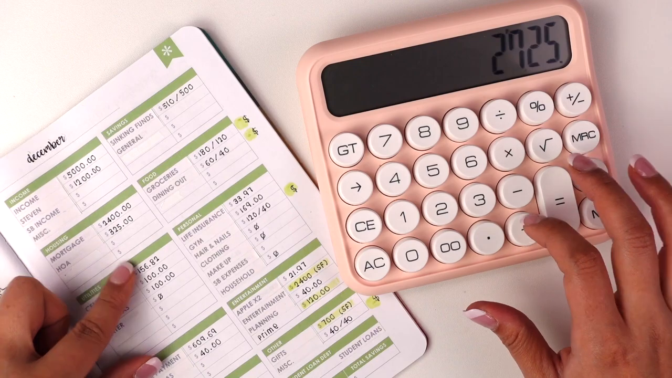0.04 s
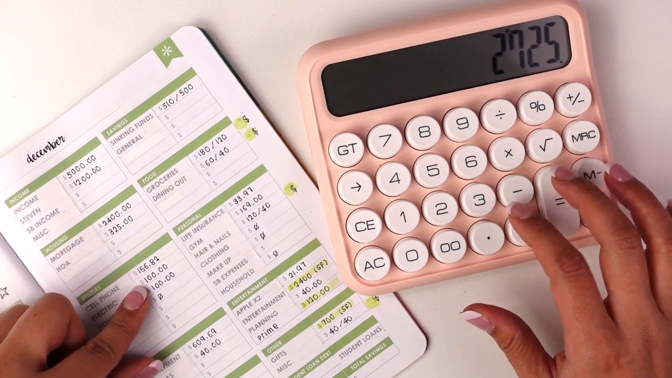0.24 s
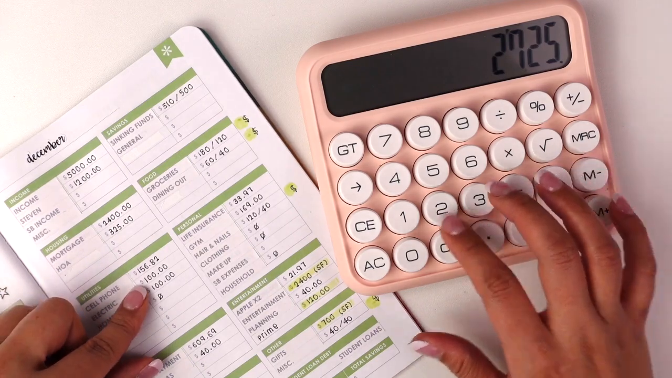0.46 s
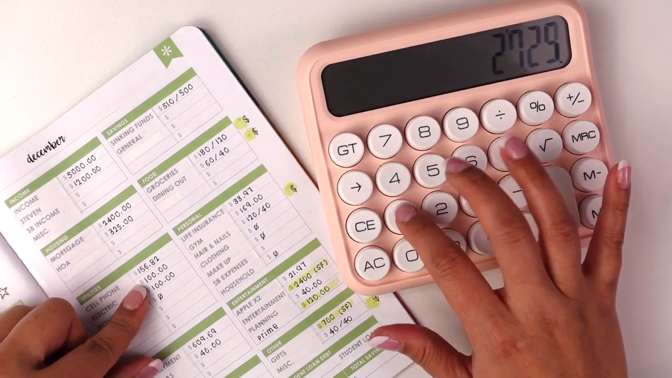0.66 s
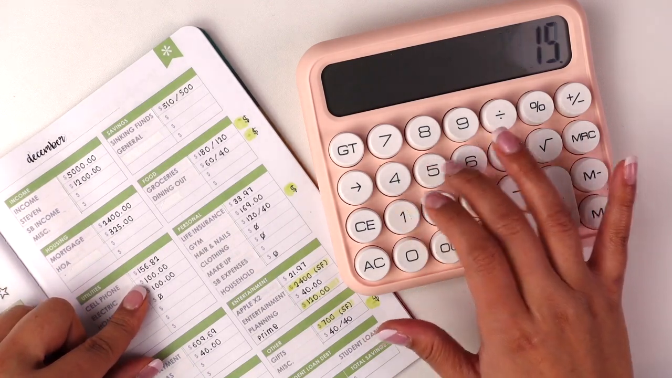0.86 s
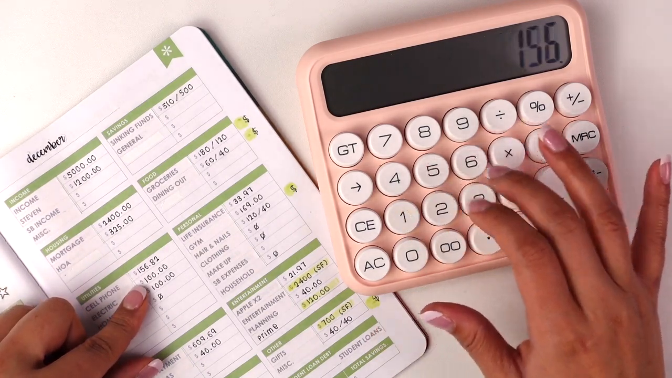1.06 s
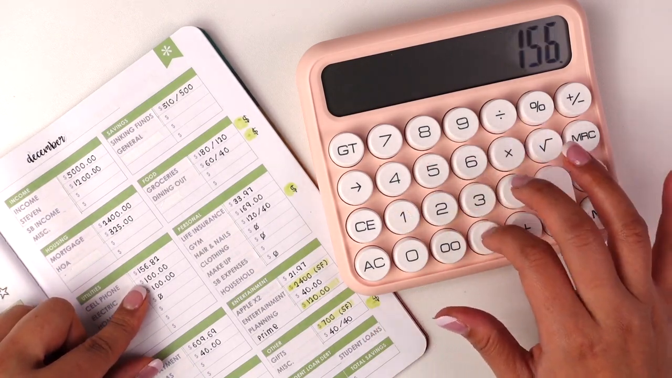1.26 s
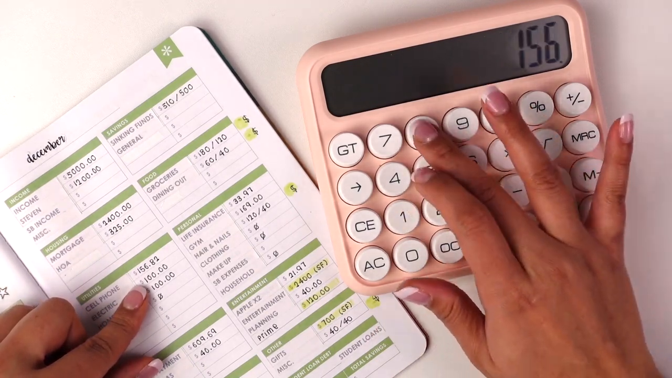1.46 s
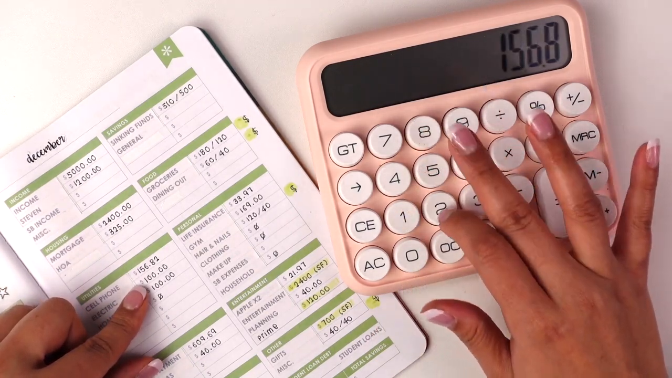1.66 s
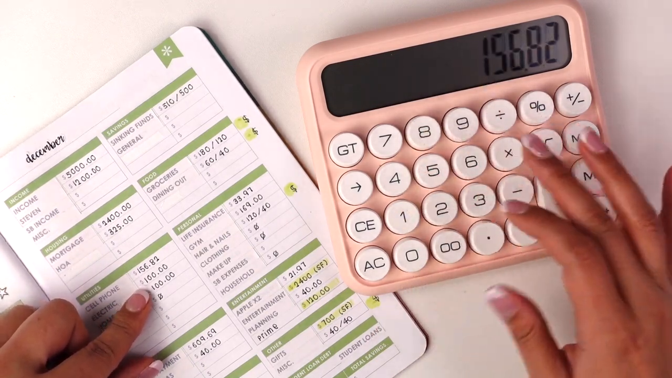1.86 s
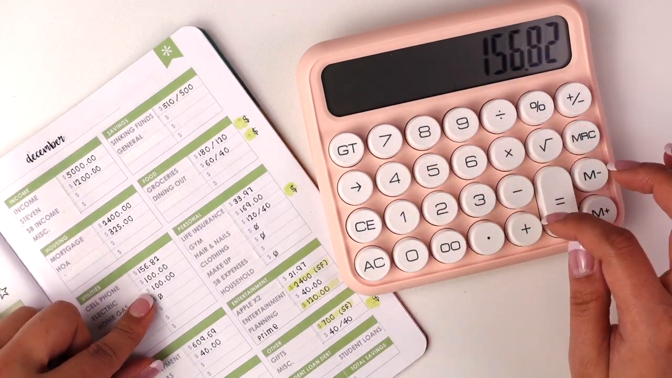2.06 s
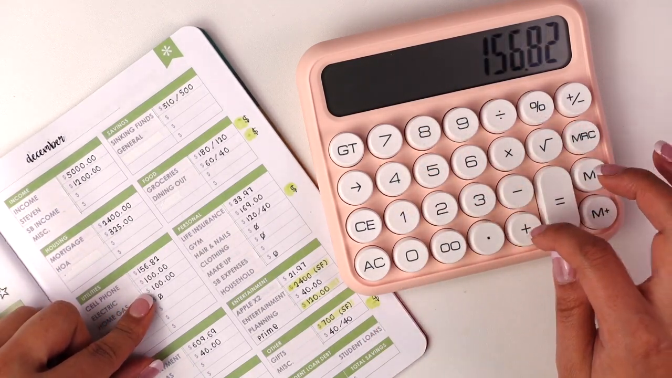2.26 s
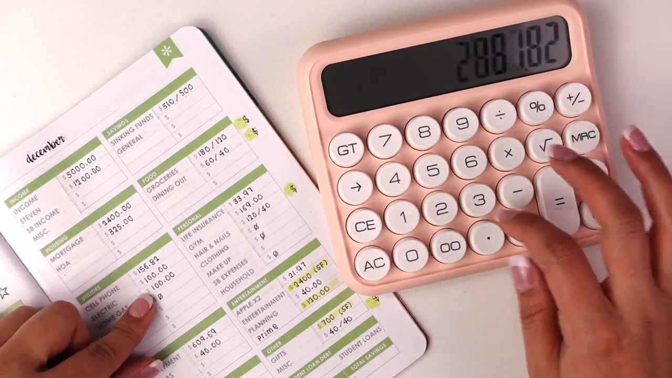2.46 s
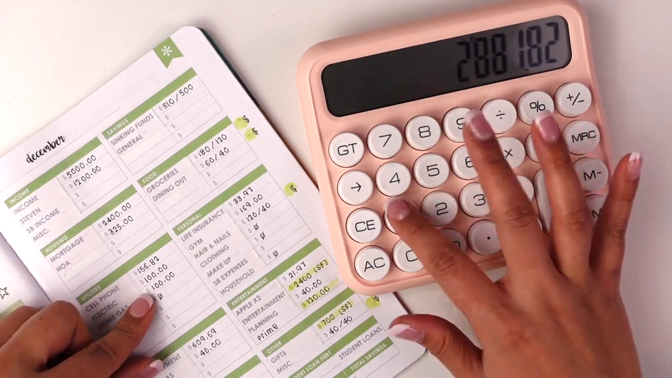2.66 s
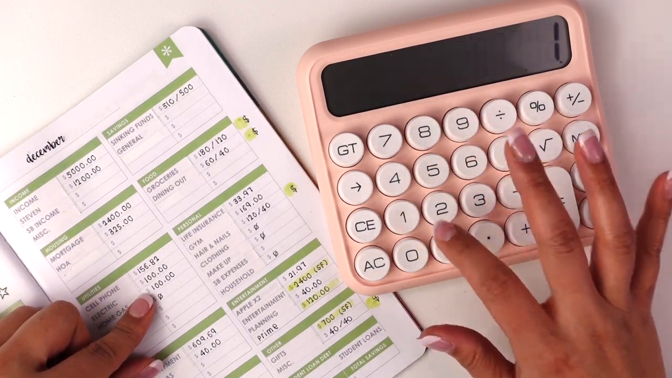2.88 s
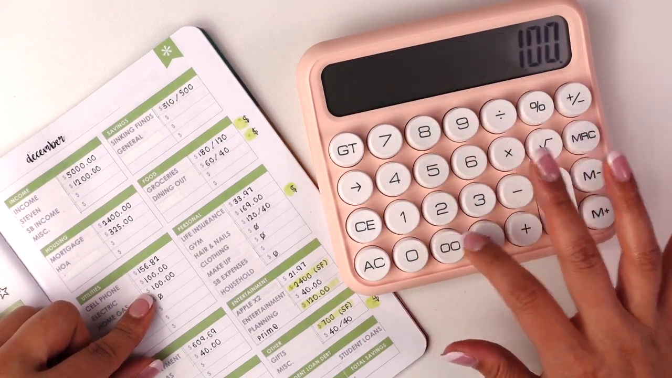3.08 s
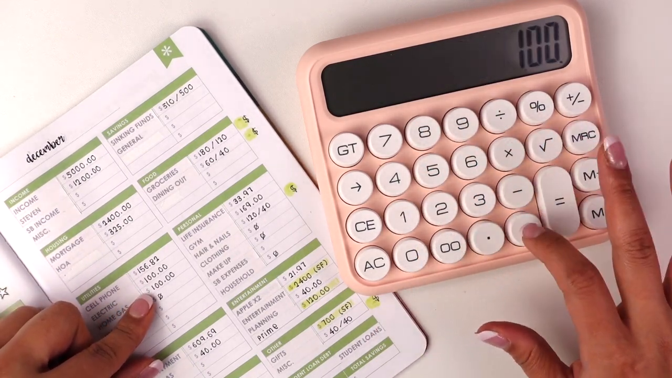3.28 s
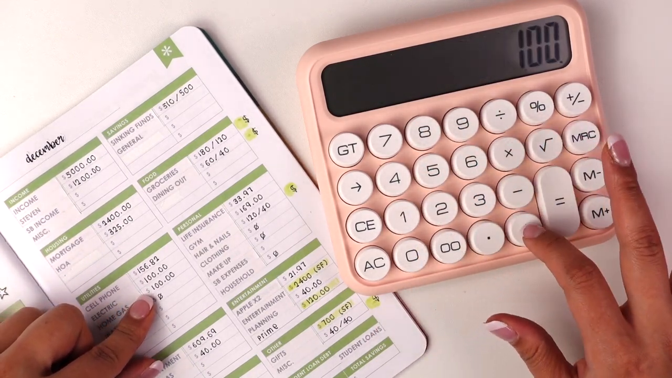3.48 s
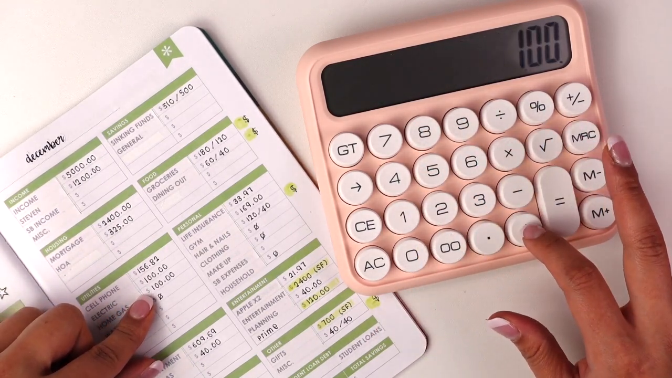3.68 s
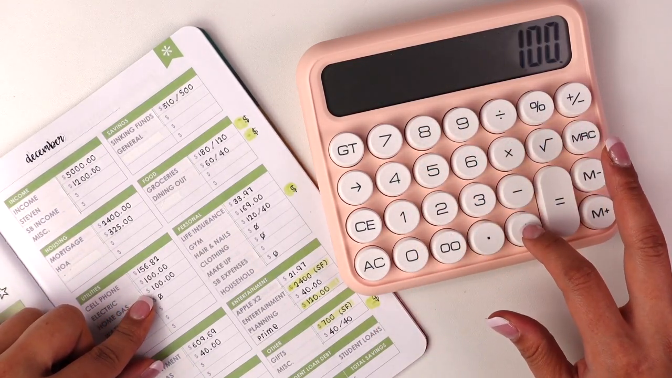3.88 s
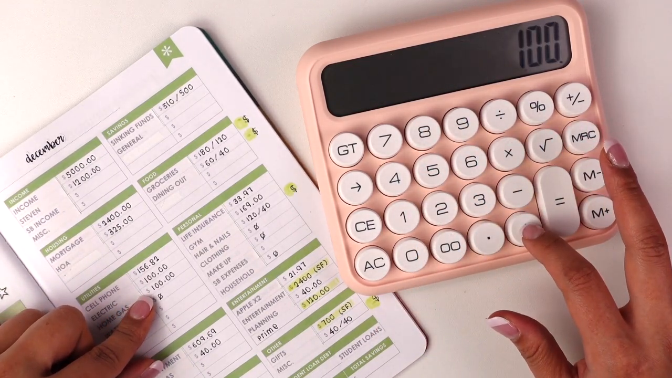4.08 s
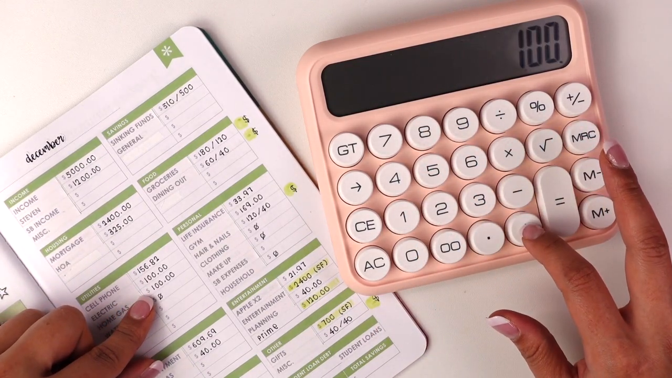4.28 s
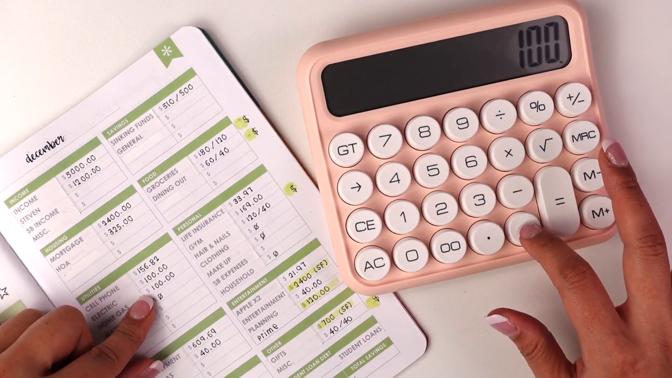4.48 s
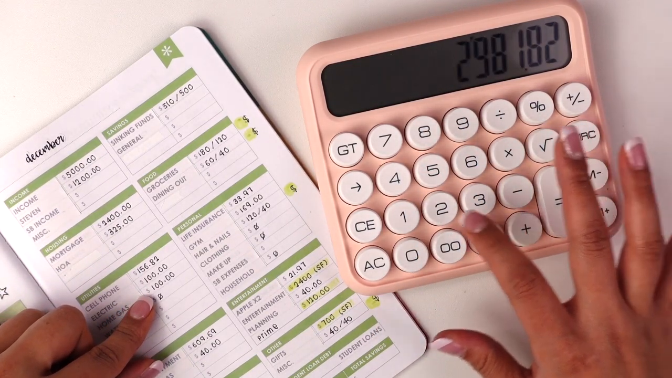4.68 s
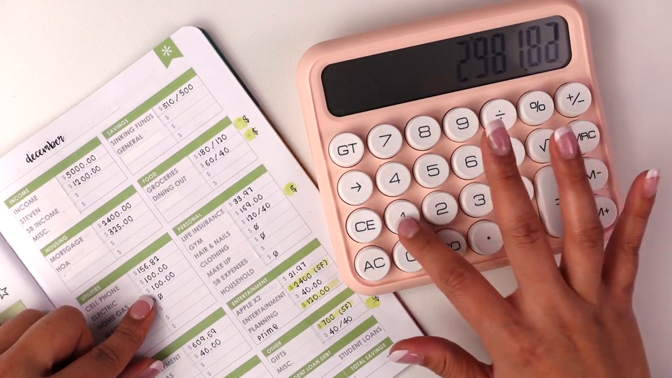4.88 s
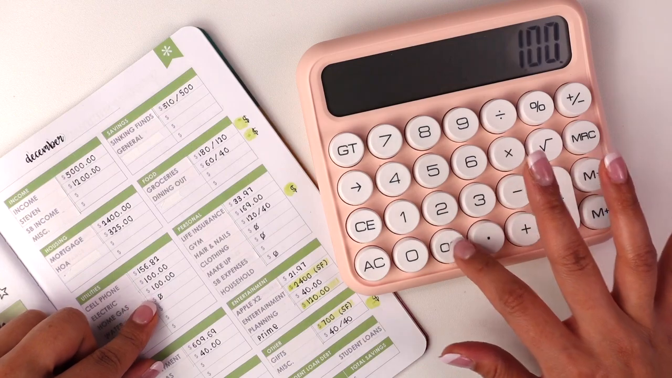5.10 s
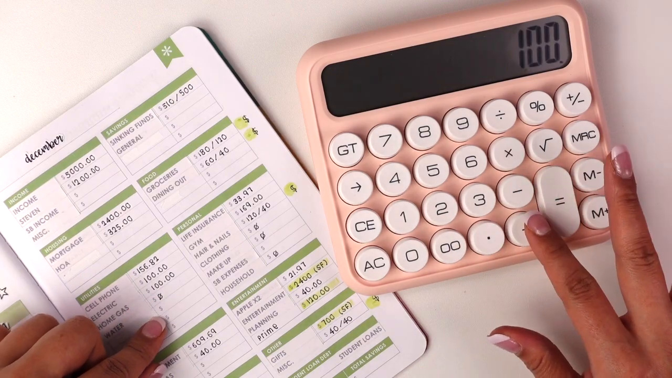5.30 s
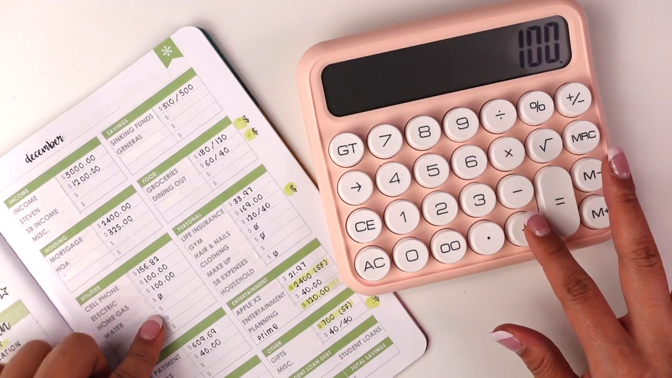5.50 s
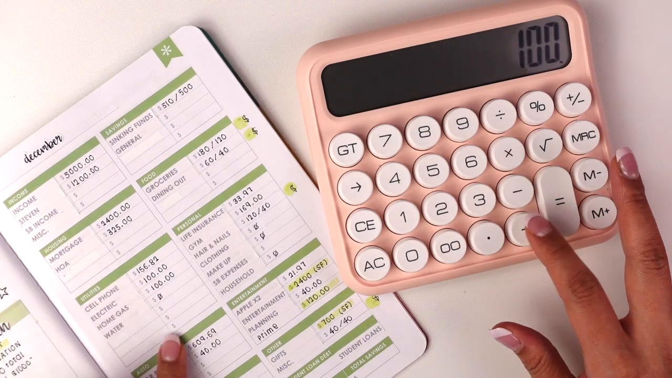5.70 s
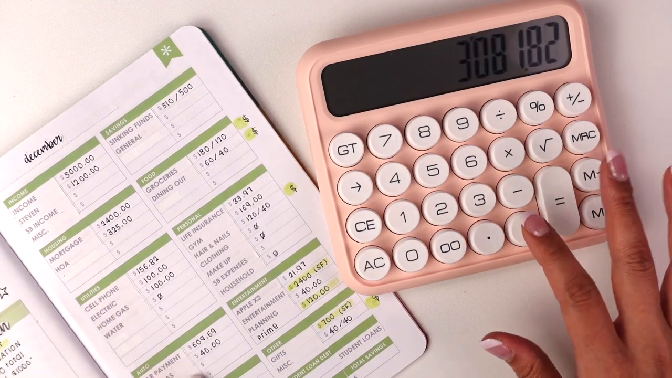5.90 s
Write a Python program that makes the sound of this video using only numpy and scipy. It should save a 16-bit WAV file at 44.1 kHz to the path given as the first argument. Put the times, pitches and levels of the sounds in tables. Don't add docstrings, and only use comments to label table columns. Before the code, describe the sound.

Close view of a desk calculator in a small quiet room: hard nails tick on plastic keys and each release snaps back with a louder clack. A busy uneven run fills the first three seconds, then a near-silent pause, one firm clack, two quick keystrokes, another pause with a faint paper rub, and a last clack. The stereo microphone is near, with a short room reflection.

```python
import sys
import numpy as np
from scipy import signal
from scipy.fft import rfft, irfft, next_fast_len
from scipy.io import wavfile
from scipy.ndimage import uniform_filter1d

SR = 44100
rng = np.random.default_rng(int(sys.argv[2]) if len(sys.argv) > 2 else 0)


def file_out(sig):
    cols = np.atleast_2d(sig).T
    lim = np.clip(cols, -1, 1)
    pcm = np.round(lim * 32767).astype(np.int16)
    wavfile.write(sys.argv[1], SR, pcm)


def decibels_to_gain(level_db):
    exponent = np.asarray(level_db, float) / 20
    return 10 ** exponent


N = 262306
SLIDE_S = 0.012

# t/s, peak level/dB, low modes/dB, brightness/dB, case rocking/dB
PRESS = [(0.6345, -27, -10, 6, -52), (0.8008, -17.5, -37, 7.5, -37), (0.989, -12.5, -38.5, -0.6, -36),
         (1.23, -18.5, -4.5, 4.5, -41.5), (1.7001, -18.5, -16, 5.5, -42), (2.353, -23.5, -3.5, 1, -47.5),
         (2.7236, -27, -17, -3, -48), (2.997, -18, -6, 6, -37.5), (3.424, -25.5, -8.5, -9, -70),
         (4.87, -30, -1.3, 2, -47), (5.0596, -20.5, -6, 7.5, -46)]


def presses():
    out = np.zeros((2, N))
    for s, db, low_db, bright_db, _ in PRESS:
        edge_db = bright_db - 4
        sound = clack(db, low_db, bright_db, edge_db, rattle_s=0.00095, first=33, swell=0.3, coil_db=-57)
        add(out, s - SLIDE_S, room(*sound, wet_db=-10, early_db=6.5))
    return out


# t/s, peak level/dB, low modes/dB, edge/dB, hollow case ring/dB
RELEASE = [(0.0443, -6.5, -28.5, -31, -63), (0.7467, -21, -4, -10, -34), (0.895, -10, -9.5, -12, -25.5),
           (1.072, -8, -11.5, -49, -29), (1.336, -11, -6, -36, -36), (1.5781, -14, -2.5, -16, -19),
           (1.8013, -10.5, -11.5, -17.5, -34.5), (2.4668, -9.5, -32, -26.5, -40),
           (2.8192, -14, -18, -5, -28), (3.0989, -6, -21.5, -35.5, -38), (4.9468, -15, -12, -16, -26.5),
           (5.1698, -6.5, -12.5, -42, -38.5), (5.899, -5.5, -16, -21, -45)]


def releases():
    out = np.zeros((2, N))
    high_at_full_scale_db, high_growth = -10.5, 0.3
    for s, db, low_db, edge_db, _ in RELEASE:
        high_db = high_at_full_scale_db + (high_growth - 1) * db
        sound = clack(db, low_db, high_db, edge_db, rattle_s=0.0028, first=2.3, swell=2.3, coil_db=-52.5)
        add(out, s - SLIDE_S, room(*sound, wet_db=-8, early_db=11.5))
    return out


# t/s, peak level/dB, low modes/dB, high modes/dB, edge/dB
TOUCH = [(0.013, -56.5, 15, 12.5, 4), (0.6552, -38, 1.5, -8.5, -26), (1.0847, -26, -13, -22.5, -26),
         (1.4964, -33, -25, -1.5, -23), (1.5001, -27.5, -6.5, 4, -10), (1.9174, -50.5, -12, -4, 2),
         (2.7112, -34, -17, -11, -12), (4.3888, -46, -7.5, -26, -39), (4.527, -33.5, -1.6, -16.5, -15.5),
         (4.652, -10.5, -25, -25.5, -26), (4.8621, -40, -23, -5, -5), (5.0926, -43.5, 8.5, -21, -32),
         (5.457, -47, -6, -2, -25), (5.5419, -44.5, -2.5, -14, -5), (5.5846, -47, 1, 1, -12),
         (5.6407, -46, -11, -1.5, -2.5), (5.7808, -33, -6.5, -17, -8), (5.79, -35, -5.5, -8, -19),
         (5.9083, -30, -25, -15.5, -30)]


def touches():
    out = np.zeros((2, N))
    for s, db, low_db, high_db, edge_db in TOUCH:
        sound = clack(db, low_db, high_db, edge_db, rattle_s=0.002, first=0, swell=6, coil_db=-58.5)
        add(out, s - SLIDE_S, room(*sound, wet_db=-2.5, early_db=14))
    return out


# f/Hz, level/dB, t60/s
CAP = [
    [(1120, -3.5, .012), (1389, 5.5, 0.011), (1800, -1, 0.016)],
    [(2330, -26, 0.011), (2665, -0.5, 0.019), (2640, 3.5, 0.0053), (2883, 3.5, 0.015), (3235, 6, 0.0096),
     (3610, -4.5, 0.02)],
    [(4395, -4.5, 0.019), (4940, 11.5, 0.0036), (5650, 5, .006), (5910, -7, 0.01), (7040, -11, 0.0062)],
]
# f/Hz, level/dB per Hz
EDGE = [(3820, -35), (6500, -3.5), (8640, -14), (11300, -13.5), (15800, -32), (16500, -69)]
# f/Hz, level/dB, t60/s
SPRING = [(8980, 3, 0.064), (8000, -4, .06)]
# f/Hz, level/dB
ALL_ROUND = [(900, 4.5), (2000, -1), (3000, 1.5), (5000, 0.5), (9000, -1), (15000, -0.5)]


def clack(db, low_db, high_db, edge_db, rattle_s, first, swell, coil_db):
    t = np.arange(SR // 16) / SR
    stop = round(SLIDE_S * SR)
    landed = t >= SLIDE_S
    u = np.clip(t - SLIDE_S, 0, None) / max(rattle_s, 2e-4)
    settling = 0.13 * decibels_to_gain(-60 * (t - SLIDE_S) / 0.037)
    chatter = landed * ((1 + swell * u) * np.exp(-u ** 2) + settling)
    slide = (t < SLIDE_S) * decibels_to_gain(-32.5 + 2500 * (t - SLIDE_S))
    strike = 1.0 * (np.arange(len(t)) == stop)

    edge = filtered(strike, lambda f: decibels_to_gain(along(EDGE, f)))[stop - 12:]
    edge = edge + decibels_to_gain(coil_db) * ring(SPRING, t[:len(edge)])
    bodies = [edge] + [ring(modes, t) for modes in CAP]

    near = 0
    for level_db, body in zip((edge_db, low_db, 0, high_db), bodies):
        burst = rng.standard_normal(len(t)) * chatter + first * strike
        even = irfft(rfft(burst) / smooth_level(burst, size=40), len(t)) * landed
        contacts = peak(even, 0) + slide * rng.standard_normal(len(t))
        near = near + peak(signal.fftconvolve(contacts, body)[:len(t)], db + level_db)
    near = steep_cut(near, 970)
    radiated = np.roll(irfft(smooth_level(near, size=28), len(t)), stop + 60)
    return near, filtered(steep_cut(radiated, 800), lambda f: decibels_to_gain(along(ALL_ROUND, f)))


def blows():
    pressed = [(s, feet_db, db - 19.5) for s, db, *_, feet_db in PRESS]
    freed = [(s, case_db - 10.5, case_db) for s, *_, case_db in RELEASE]
    firm_db = -40
    touched = [(s, db + low - 13, db + low - 6) for s, db, low, *_ in TOUCH if db + low > firm_db]
    return pressed + freed + touched


# f/Hz, level/dB, t60/s
FEET = [(454.4, -0.5, .07), (593, -0.5, .05)]
# f/Hz, level/dB, t60/s
CASE = [(873, -1, 0.069), (938, 1.5, 0.049)]


def case_knocks():
    out, t = np.zeros((2, N)), np.arange(SR // 4) / SR
    lag_s = 0.0015
    for s, feet_db, case_db in blows():
        feet = peak(ring(FEET, t) * (1 - np.exp(-(t / 0.0051) ** 2)), feet_db)
        case = peak(ring(CASE, t) * (1 - np.exp(-(t / 0.0035) ** 2)), case_db)
        knock = steep_cut(feet + case, 300)
        add(out, s + lag_s, room(knock, knock, wet_db=-21, early_db=3))
    return out


# t/s, peak level/dB, f/Hz
THUD = [(0.653, -46, 119), (0.807, -42.5, 109.4), (0.997, -45.5, 174.5), (1.235, -47.5, 153),
        (1.502, -47, 105), (1.579, -55, 156), (1.704, -49, 106), (1.807, -50, 157), (2.363, -48.5, 108),
        (2.725, -49, 150), (3.008, -41, 143.3), (4.529, -54, 109.4), (4.871, -44, 136.4),
        (5.078, -40.5, 139), (5.785, -48.5, 108)]


def table_thuds():
    out, t = np.zeros((2, N)), np.arange(SR // 4) / SR
    for s, db, hz in THUD:
        modes = [(hz, 0, 0.09), (hz * 0.9, -4, 0.09), (hz * 1.2, -2.5, 0.08), (hz * 1.756, -4, 0.07)]
        waver = 1 + 0.5 * np.cos(2 * np.pi * rng.uniform(18, 22) * t)
        onset = 1 - np.exp(-(t / 0.026) ** 2)
        swell = ring(modes, t) * waver * onset
        add(out, s - 0.008, peak(steep_cut(swell, 75), db) * decibels_to_gain([[-0.3], [0.3]]))
    return out


def wash(t):
    power = 0
    for s, db, *_ in RELEASE + TOUCH:
        u = t - s - 0.032
        fast = decibels_to_gain(db - 46 - 60 * np.abs(u) / 0.32)
        slow = decibels_to_gain(db - 51.5 - 60 * np.abs(u) / 1.4)
        power = power + (u > 0) * (fast + slow) ** 2
    return np.sqrt(power)


# t/s, rustle level/dB
PAGE = [
    [(0.0, -60), (0.06, -48), (0.218, -63.5), (0.29, -81.5), (0.56, -70), (0.62, -62)],
    [(5.5, -68), (5.582, -59), (5.726, -54.5), (5.948, -46.5)],
]
# f/Hz, level/dB per Hz
PAPER = [(180, -50.5), (300, -24.5), (539, -8), (717, -16.5), (834, -12), (1190, -21), (1800, -5.5),
         (2790, -7), (3090, -9), (4390, -8.5), (6240, -11.5), (15200, -24), (16500, -43.5)]


def page():
    t = np.arange(N) / SR
    level = wash(t)
    grain = decibels_to_gain(1.8 * unit(uniform_filter1d(rng.standard_normal(N), 500)))
    noise = rng.standard_normal((2, N)) * grain
    hiss = unit(spread(noise, lambda f: decibels_to_gain(along(PAPER, f)), [(500, 0.9), (8000, 1.0)]))
    for stroke in PAGE:
        s, db = np.transpose(stroke)
        level = level + decibels_to_gain(np.interp(t, s, db, left=-120, right=-120))
    return level * hiss


# start t/s, end t/s, f/Hz, width/Hz, rms level/dB
RUB = [(.545, .62, 3500, 250, -62), (5.62, 6.0, 1850, 200, -58.5), (5.62, 6.0, 3250, 250, -63),
       (5.264, 5.276, 2270, 250, -45)]


def rub():
    t, out = np.arange(N) / SR, 0
    for start, end, hz, width, db in RUB:
        stroke = np.sin(np.pi * np.clip((t - start) / (end - start), 0, 1)) ** 0.5
        band = filtered(rng.standard_normal(N), lambda f: 1 / (1 + ((f - hz) / width) ** 2))
        out = out + decibels_to_gain(db) * stroke * unit(band)
    return out


# f/Hz, level/dB per Hz
AIR = [(15, -51.5), (25, -23), (142, -1.5), (182, -1), (410, -5), (510, -6), (568, -6), (617, -10),
       (831, -1), (1010, -10.5), (1730, -10), (2670, -19), (13300, -28.5), (15200, -28.5), (16500, -40.5)]
# f/Hz, width/Hz, rms level/dB
VENT = [(874, 20, -70), (1920, 40, -75.5)]
# f/Hz, left-right likeness
ALIKE = [(60, 0.61), (240, 0.5), (950, 0.13), (3770, 0.36), (15000, 1)]


def air():
    tone = decibels_to_gain(-59) * unit(spread(rng.standard_normal((2, N)), lambda f: decibels_to_gain(along(AIR, f)), ALIKE))
    for hz, width, db in VENT:
        band = spread(rng.standard_normal((2, N)), lambda f: 1 / (1 + ((f - hz) / width) ** 2), ALIKE)
        tone += decibels_to_gain(db) * unit(band)
    return tone


# f/Hz, t60/s
ROOM = [(200, .35), (800, 0.58), (3000, 0.35), (8000, 0.3), (15000, .15)]
# f/Hz, left-right likeness
WALLS = [(200, 0.95), (2000, 0.92), (12000, 1)]
# f/Hz, left-right level/dB
PORTS = [(250, -.6), (1500, -.6), (4000, -.3), (9000, .5), (14000, .9)]


def room(sound, radiated, wet_db, early_db):
    hz, t, z = signal.stft(rng.standard_normal((2, SR // 2)), SR, nperseg=256)
    fall = decibels_to_gain(-60 * t / along(ROOM, hz)[:, None]) + decibels_to_gain(early_db - 60 * t / 0.06)
    tail = signal.istft(z * fall, SR, nperseg=256)[1]
    onset = np.clip(np.arange(tail.shape[1]) / SR / 0.0026, 0, 1)
    tail = spread(tail, lambda f: 1 + 0 * f, WALLS) * onset
    tail = tail / np.linalg.norm(tail[0])
    out = decibels_to_gain(wet_db) * signal.fftconvolve(radiated[None], tail, axes=1)
    half = np.array([[0.5], [-0.5]])
    lag_s = 2.5e-6 * rng.choice([-1, 1])
    ports = lambda f: decibels_to_gain(half * along(PORTS, f)) * np.exp(2j * np.pi * f * lag_s * half)
    add(out, 0, filtered(sound, ports))
    add(out, 0.0125, decibels_to_gain(-18.5) * sound)
    return out


def ring(modes, t):
    out = 0
    for hz, db, t60 in modes:
        strength_db, detune = rng.standard_normal(2) * [2.5, 0.02]
        out = out + decibels_to_gain(db + strength_db - 60 * t / t60) * np.sin(2 * np.pi * hz * (1 + detune) * t)
    return out


def steep_cut(x, hz):
    return signal.sosfilt(signal.butter(6, hz, "high", fs=SR, output="sos"), x)


def smooth_level(x, size):
    return np.sqrt(np.abs(uniform_filter1d(np.abs(rfft(x)) ** 2, size=size)) + 1e-14)


def spread(pair, gain, alike):
    turn = lambda hz: np.arccos(np.clip(along(alike, hz), -1, 1)) / 2
    mid, side = filtered(pair, lambda hz: gain(hz) * [np.cos(turn(hz)), np.sin(turn(hz))])
    return np.array([mid + side, mid - side])


def filtered(x, response):
    m = next_fast_len(x.shape[-1] + 4096)
    return irfft(rfft(x, m) * response(np.fft.rfftfreq(m, 1 / SR)), m)[..., :x.shape[-1]]


def along(points, hz):
    f, v = np.transpose(points)
    return np.interp(np.log(hz + 1), np.log(f + 1), v)


def unit(x):
    return x / np.sqrt(np.mean(x ** 2) + 1e-20)


def peak(x, db):
    return decibels_to_gain(db) * x / np.abs(x).max()


def add(track, s, sound):
    part = track[..., round(s * SR):][..., :sound.shape[-1]]
    part += sound[..., :part.shape[-1]]


def scene():
    keys = presses() + releases() + touches()
    return keys + case_knocks() + table_thuds() + page() + rub() + air()


def roll_off(x):
    return signal.sosfilt(signal.butter(12, 16820, fs=SR, output="sos"), x)


def record(dry):
    top_hz = 16100
    mix = filtered(dry, lambda f: f < top_hz)
    return roll_off(mix)


dry = scene()
out = record(dry)
file_out(out)
```